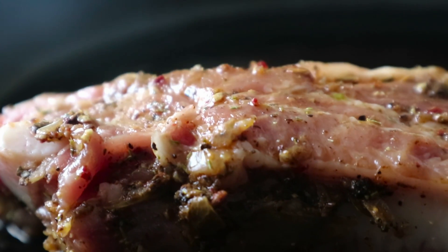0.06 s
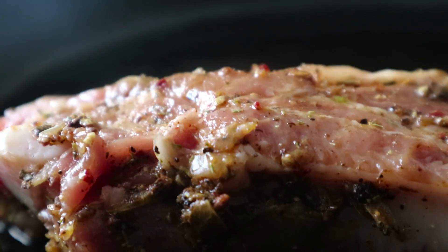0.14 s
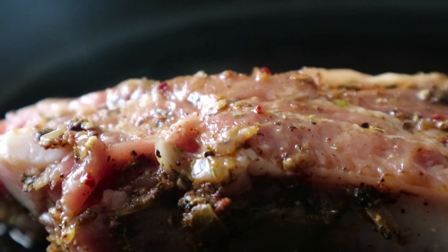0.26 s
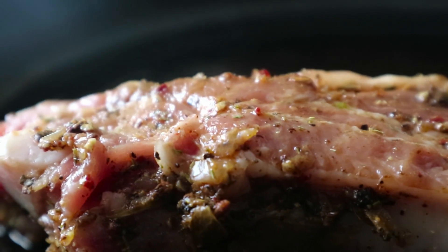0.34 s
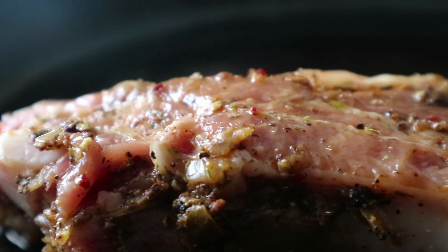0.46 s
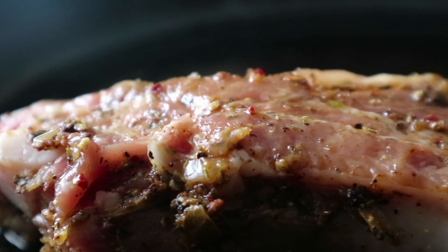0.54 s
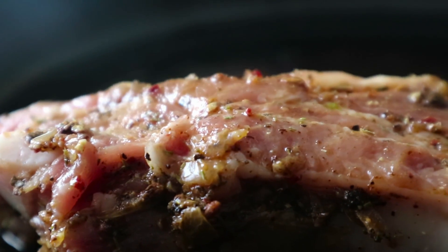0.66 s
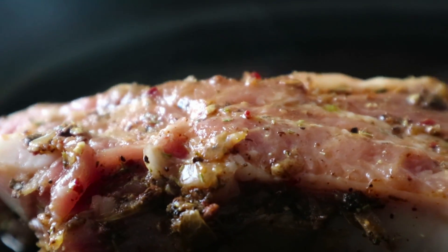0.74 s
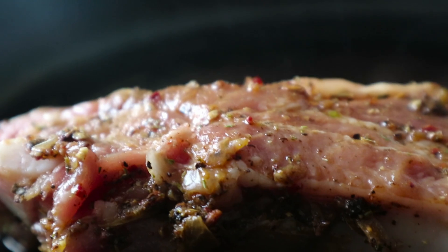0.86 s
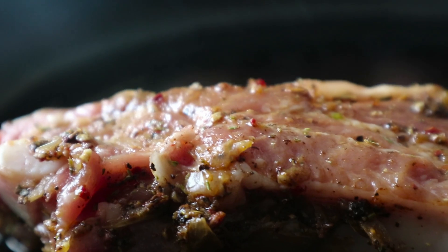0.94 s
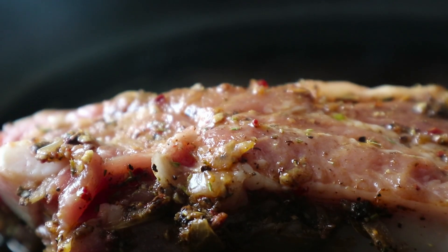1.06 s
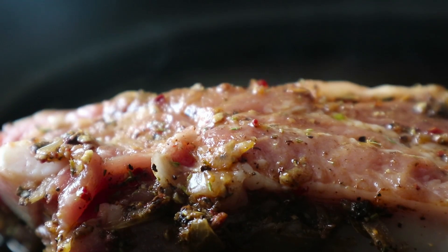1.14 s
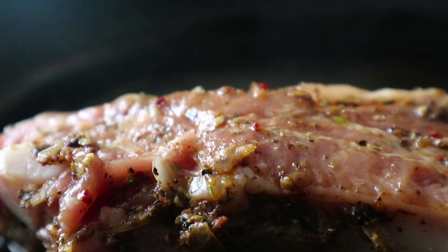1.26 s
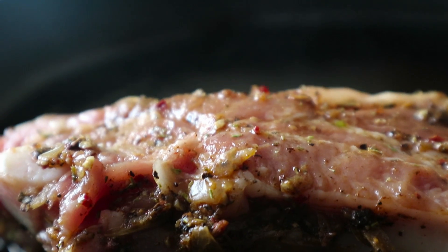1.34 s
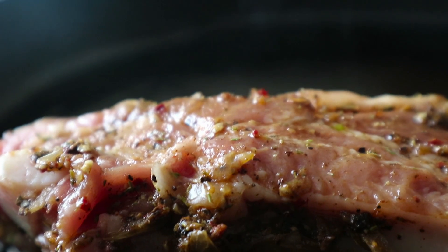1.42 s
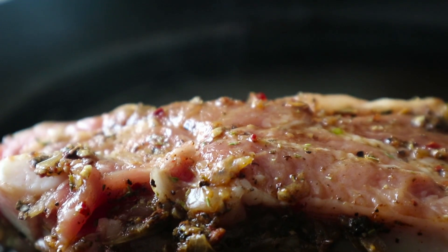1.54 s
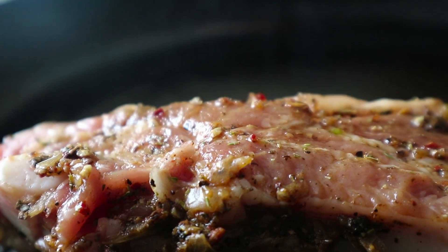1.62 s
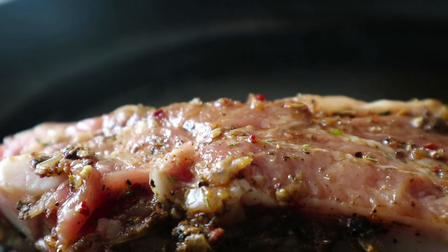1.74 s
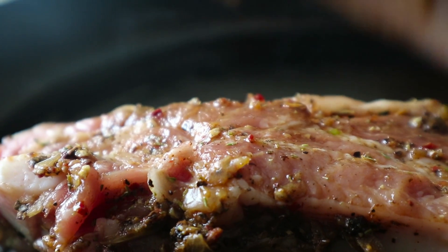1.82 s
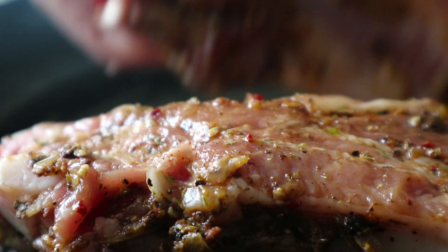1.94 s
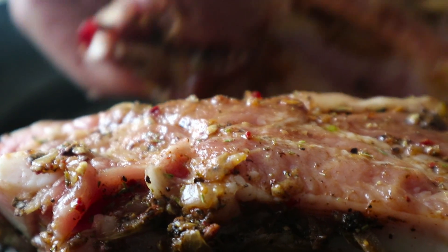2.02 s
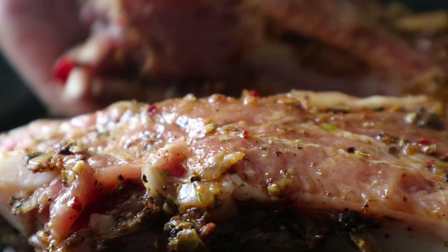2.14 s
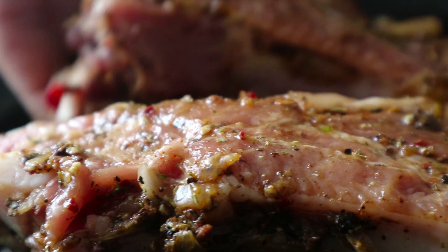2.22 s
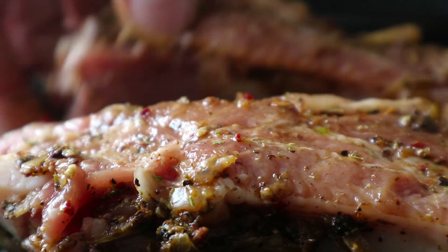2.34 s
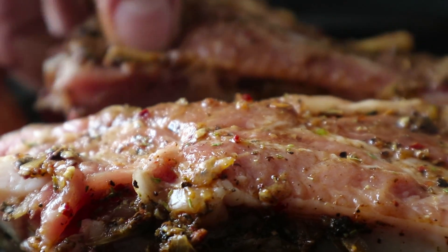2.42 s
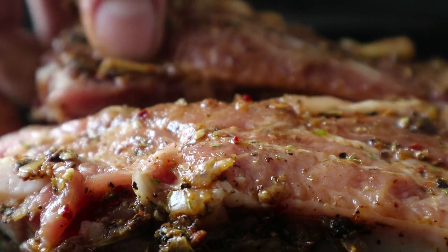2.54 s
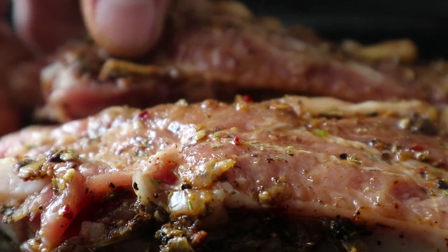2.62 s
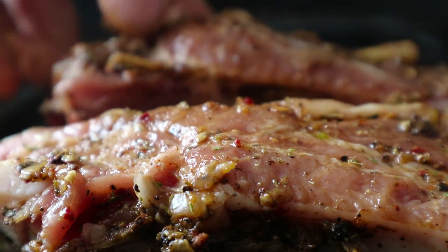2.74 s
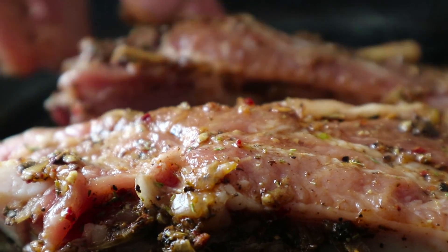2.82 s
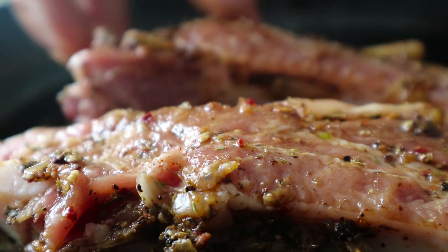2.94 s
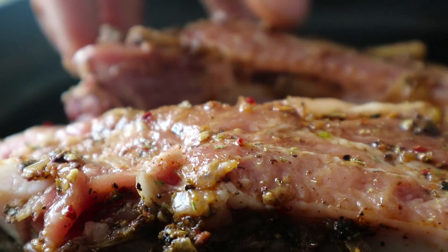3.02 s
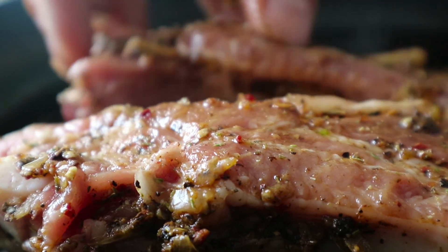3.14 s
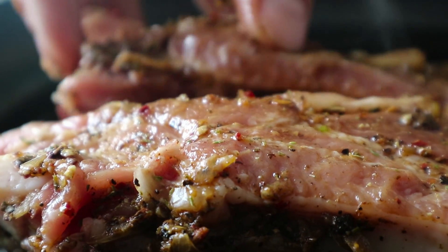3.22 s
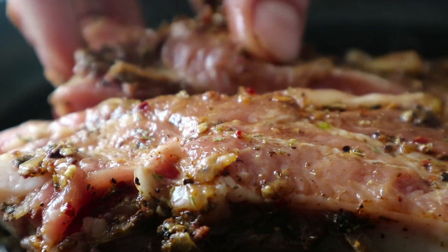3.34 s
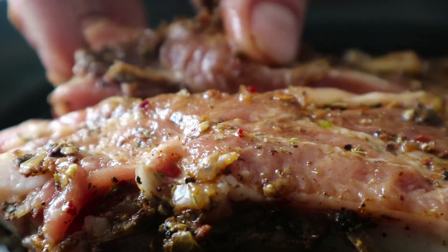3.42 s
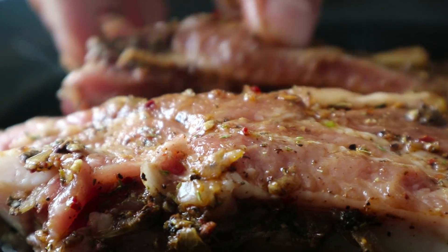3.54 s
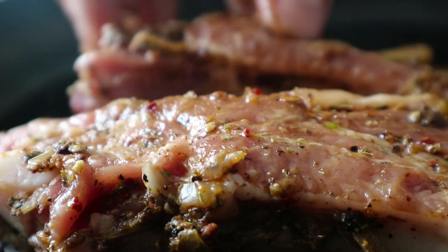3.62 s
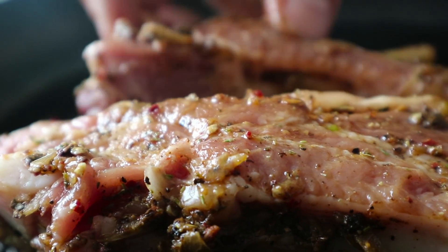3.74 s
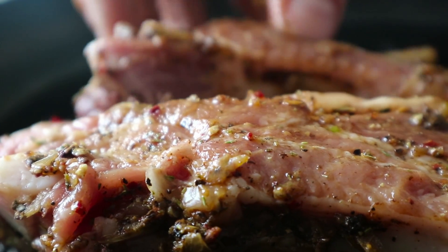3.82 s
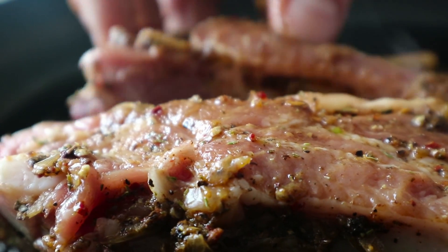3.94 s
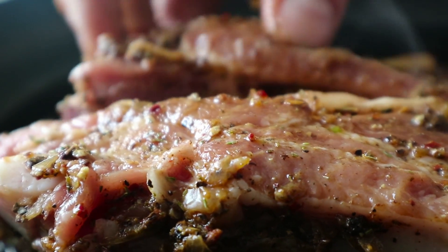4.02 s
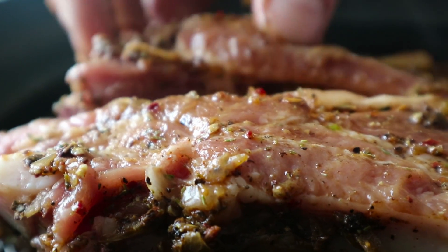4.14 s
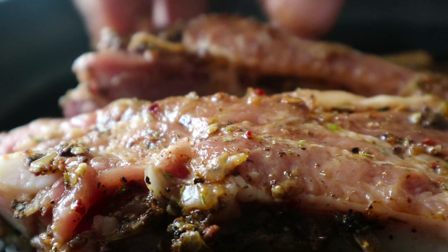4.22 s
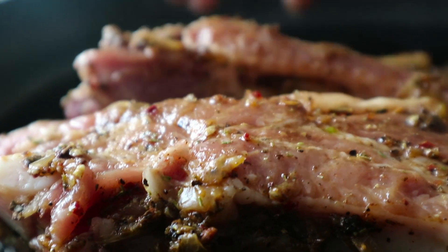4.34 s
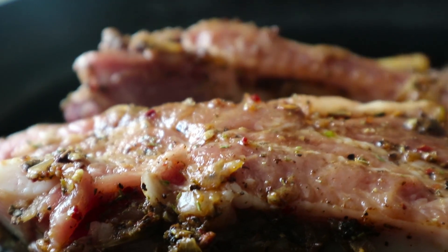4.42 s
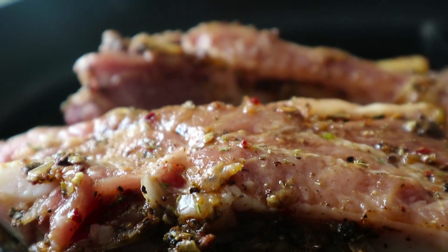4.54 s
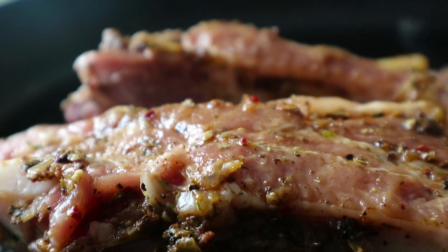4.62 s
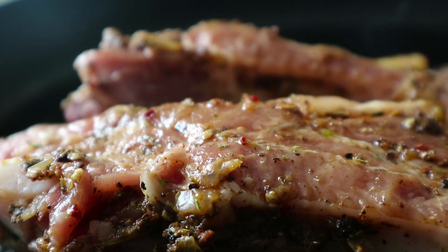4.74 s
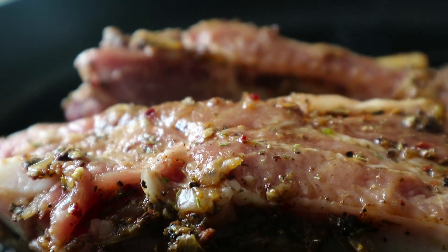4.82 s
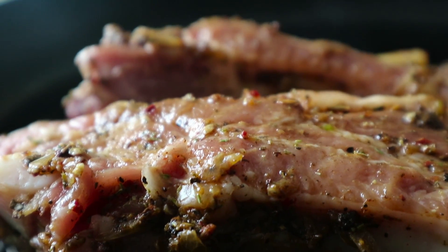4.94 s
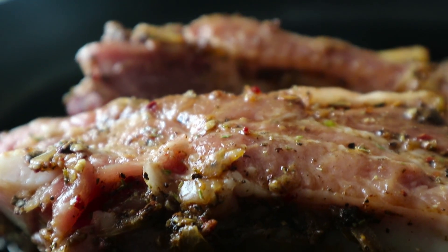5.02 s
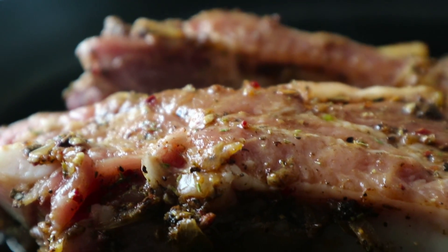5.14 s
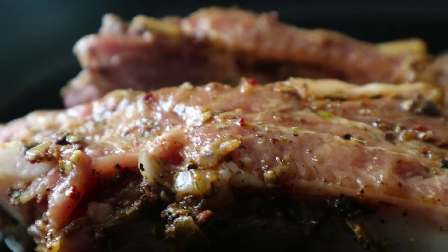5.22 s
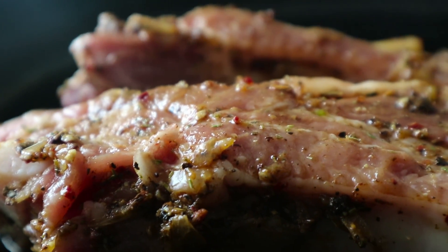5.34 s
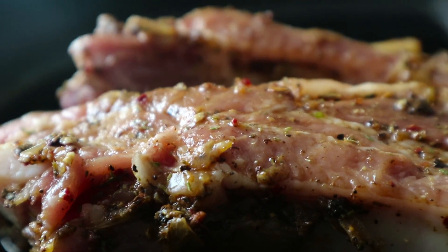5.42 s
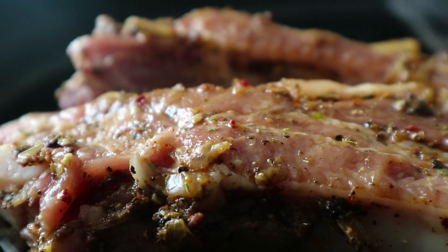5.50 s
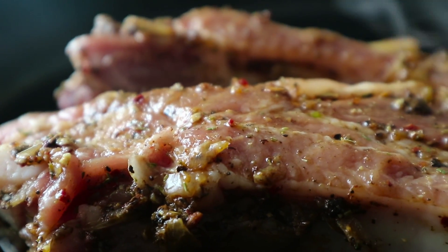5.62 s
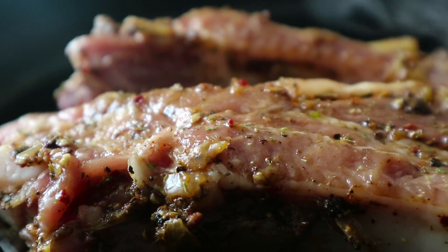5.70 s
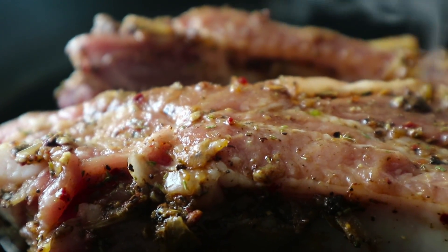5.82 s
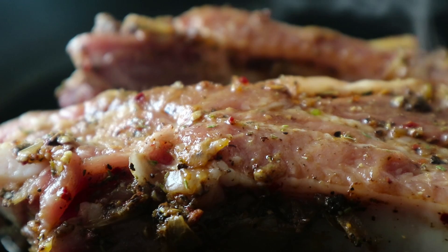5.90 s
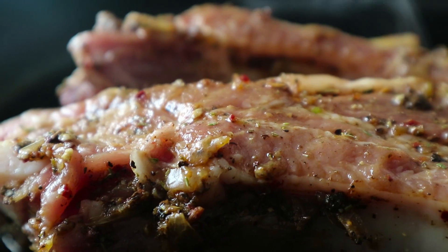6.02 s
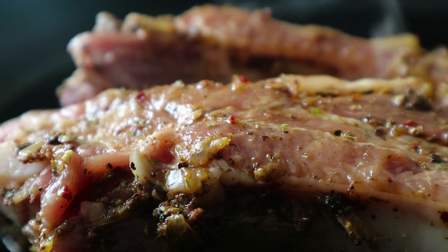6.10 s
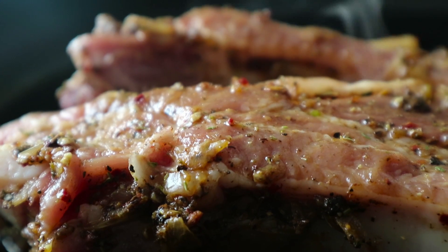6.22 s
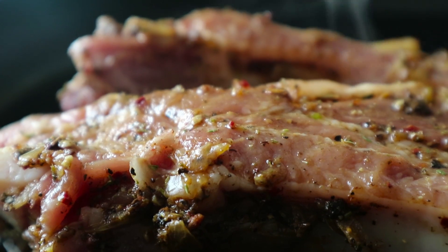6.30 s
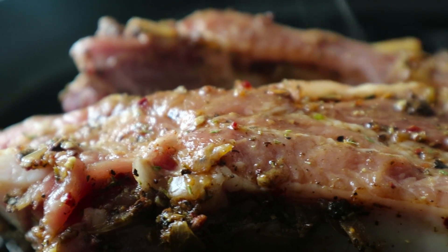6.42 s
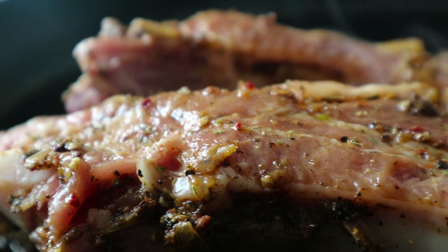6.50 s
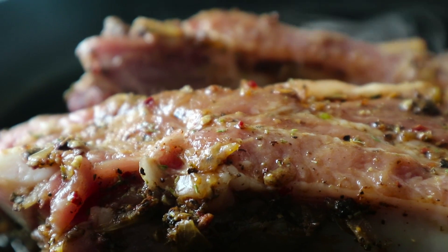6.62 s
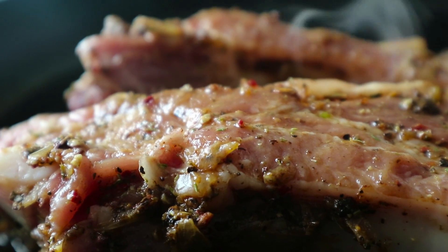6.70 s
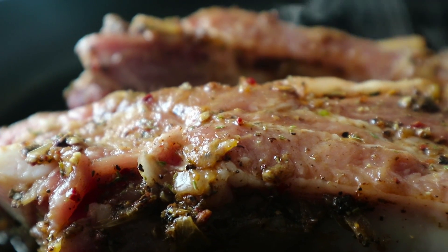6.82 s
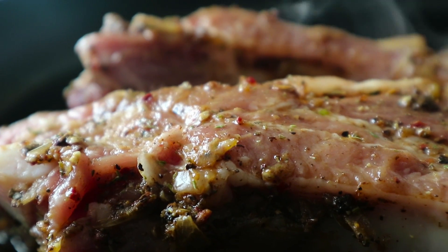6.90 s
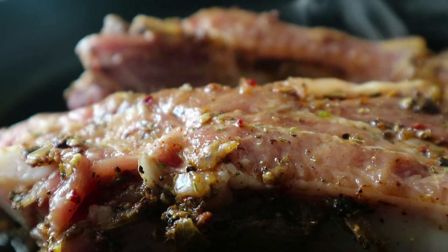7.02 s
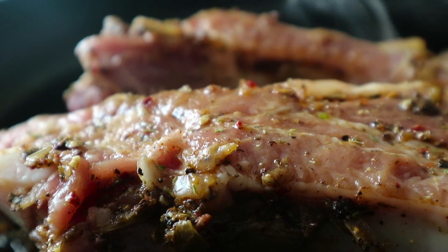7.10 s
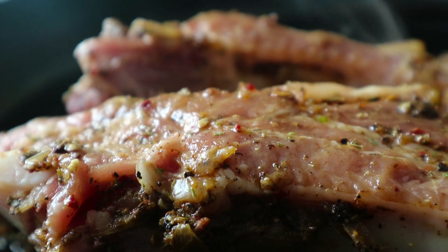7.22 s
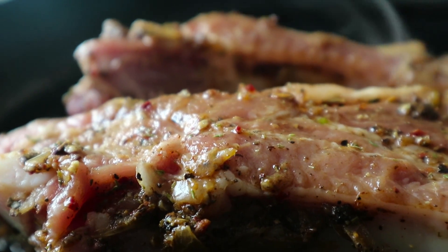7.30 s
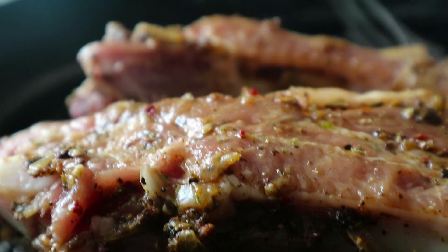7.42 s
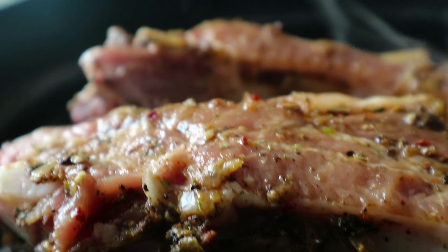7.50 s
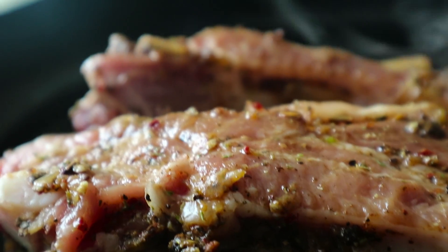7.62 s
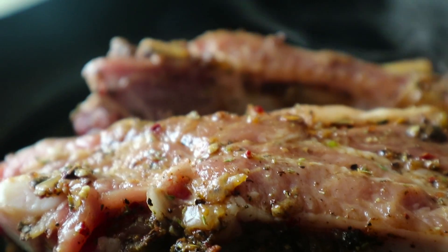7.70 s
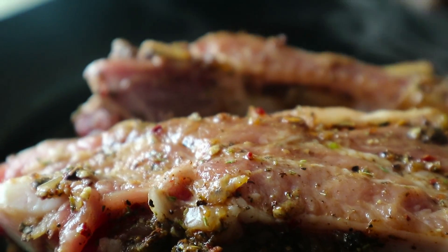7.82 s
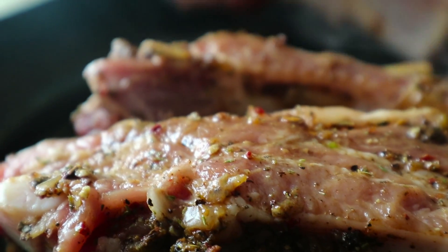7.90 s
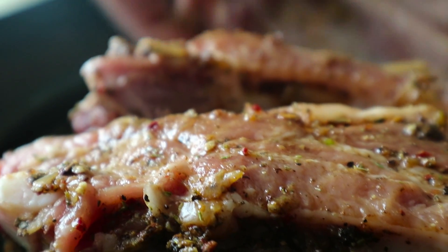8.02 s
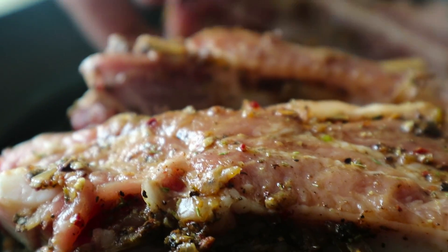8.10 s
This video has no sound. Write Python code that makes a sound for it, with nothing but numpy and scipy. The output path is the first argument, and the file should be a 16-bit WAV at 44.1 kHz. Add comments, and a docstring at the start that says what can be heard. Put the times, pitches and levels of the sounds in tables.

```python
"""Ribs frying in a steel pan

A kitchen, a stereo microphone close to the pan. A marinated rib fries in hot oil; after two seconds a
second rib is laid behind it and pressed down, and the sizzle grows. Steam bubbles of all sizes burst
along the meat, air pockets under the new rib ring at a sliding pitch, large bubbles pop and fat spits.
The pan rings faintly and the room answers, over a low rumble."""
import sys
import numpy as np
from scipy import signal
from scipy.fft import rfft, irfft, next_fast_len
from scipy.io import wavfile
from scipy.ndimage import uniform_filter1d, map_coordinates

SR = 44100
rng = np.random.default_rng(int(sys.argv[2]) if len(sys.argv) > 2 else 0)


def wav_record(signal):
    """Record a signal, one row per channel, as 16-bit PCM in the file named by sys.argv[1]."""
    frames = np.transpose(np.atleast_2d(signal))
    bounded = np.clip(frames, -1, 1)
    # unit amplitude maps onto the largest positive 16-bit level
    quanta = np.round(bounded * 32767).astype(np.int16)
    wavfile.write(sys.argv[1], SR, quanta)


N = 359856
M = next_fast_len(N + SR // 2, True)  # FFT length, with room for the tails
TIME, HZ = np.arange(N) / SR, np.fft.rfftfreq(M, 1 / SR)
SIDES = np.array([[.5], [-.5]])  # shares a left-right difference between the two microphones


def amp(db):
    """Gain of a level in dB."""
    return 10 ** (np.asarray(db) / 20)


def unit(x):
    """x at rms 1."""
    return x / np.sqrt(np.mean(np.abs(x) ** 2) + 1e-20)


def along(points, hz):
    """(Hz, value) points interpolated on a log frequency axis."""
    f, v = np.transpose(points)
    return np.interp(np.log(hz + 1), np.log(f + 1), v)


def curves(rows):
    """One value per sample for each column after the time."""
    times, *columns = np.transpose(rows)
    return [np.interp(TIME, times, column) for column in columns]


def wobble(rate):
    """A random curve through rate knots a second."""
    return map_coordinates(rng.standard_normal(int(N * rate / SR) + 4), [TIME * rate], order=1)


def mode(centre_hz, width_hz):
    """Spectrum of a causal resonance of gain 1 at its centre."""
    return 1j * HZ * width_hz / (centre_hz ** 2 - HZ ** 2 + 1j * HZ * width_hz)


def bursts(rate, spread_db, lag_s=0, width_s=0):
    """Stereo impulses, many small, few large, most pushing outwards; each has its own lag on the left."""
    when, sign, size, place = rng.random((4, int(rate * N / SR)))
    size = np.sign(sign - .25) * amp(spread_db * np.minimum(-np.log(1 - size), 4.8))
    right = (when * N).astype(int)
    lag = SR * (lag_s + width_s * (2 * place - 1) ** 3)
    left = np.clip(right + np.round(lag).astype(int), 0, N - 1)
    return unit(np.array([np.bincount(left, size, N), np.bincount(right, size, N)]))


def rumble(rise_s=.073, fall_s=.018):
    """Faint, unsteady rumble of stove and room, only partly alike at the two microphones."""
    # spectrum of the rumble: (frequency [Hz], relative level [dB])
    tone = [(15, -2), (30, -8), (70, -12), (140, 0.5), (180, 6.5), (260, -3), (400, -48)]
    # its brief swells: (time [s], peak level [dB])
    swell_peaks = [(0.77, -73), (2.07, -85), (2.45, -71), (2.89, -62), (3.41, -77), (3.75, -77),
                   (4.07, -61), (4.2, -66), (4.68, -75), (5.38, -68), (6.02, -74)]
    both, left, right = rng.standard_normal((3, N))
    noise = irfft(rfft([both + .8 * left, both + .8 * right], M) * amp(along(tone, HZ)), M)[:, :N]
    swells = sum(amp(db) * np.exp(-np.abs(TIME - s) / np.where(TIME < s, rise_s, fall_s))
                 for s, db in swell_peaks)
    return (amp(-73.5 + 2.5 * wobble(11)) + swells) * unit(noise)


def kitchen(x, tail_db, tails):
    """Direct sound, echoes and reverberation; several room tails take turns, crossfading thrice a second."""
    # echoes off nearby surfaces: (delay [s], level [dB])
    walls = [(.0012, -41), (.0088, -30), (0.017, -49)]
    # decay of the room: (frequency [Hz], time to fall 60 dB [s])
    decay = [(200, 0.51), (2000, 0.41), (10000, 0.15)]
    turn = TIME * 3 % tails
    wet = rfft(x, M) * (1 + sum(amp(db) * np.exp(-2j * np.pi * HZ * s) for s, db in walls))
    for k in range(tails):
        hz, t, noise = signal.stft(rng.standard_normal((2, SR // 3)), SR, nperseg=256)
        tail = signal.istft(noise * amp(-60 * t / along(decay, hz)[:, None]), SR, nperseg=256)[1]
        tail = np.pad(tail / np.linalg.norm(tail[0]), ((0, 0), (400, 0)))  # arrives 9 ms late
        away = np.abs((turn - k + tails / 2) % tails - tails / 2)
        fade = np.cos(np.pi / 2 * np.minimum(away, 1))
        wet += amp(tail_db) * rfft(tail, M) * rfft(x.mean(0) * fade, M)
    return irfft(wet, M)[:, :N]


def steel_pan(spectrum):
    """The frying shakes the pan, whose modes ring along with the direct sound."""
    # modes of the pan: (frequency [Hz], width [Hz], level against the direct sound [dB])
    modes = [(146, 5.3, -24), (177, 13, -22), (250, 15, -2.5), (281.7, 4.7, 0.5), (354, 5.3, -39),
             (417, 9.2, -9), (624, 33, -13), (699, 26, 1.5), (870, 26, 4), (1016, 16, -4.5), (1125, 34, -6),
             (1216, 44, -4.5), (1350, 44, -9), (1686, 21, -14), (1758, 25, -10), (1915, 22, -7),
             (2000, 18, -37), (2450, 23, -7.5), (2710, 12, -0.5), (2750, 19, -27), (3044, 24, -1)]
    return spectrum * (1 + sum(amp(db) * mode(hz, width_hz) for hz, width_hz, db in modes))


def spits(half_length_s=.011, width_hz=1300):
    """Hot fat spits and brief clumps of crackling bubbles: each time a brief, dense hiss around its own pitch.
    Returns a spectrum."""
    # spits of fat, and near 1.7 kHz early on brief clumps of crackling bubbles: (time [s], level [dB], pitch
    # [Hz])
    events = [(.03, -46, 6500), (.555, -37, 1750), (.75, -38, 1700), (1.0, -48, 7500), (1.045, -40, 1300),
              (1.14, -38, 1800), (1.225, -39, 1900), (1.475, -39, 1900), (1.84, -42, 5800),
              (2.47, -38, 6000), (3.02, -35, 6000), (3.2, -35, 5300), (3.73, -35, 6000), (3.98, -34, 5600),
              (4.47, -30, 3000), (4.502, -29, 1450), (4.535, -31, 1400), (4.965, -29, 1600),
              (5.095, -31, 1950), (5.42, -38, 5400), (5.82, -36, 5600), (6.085, -36, 5200),
              (7.05, -31, 2200), (7.556, -33, 5500), (7.588, -36, 5900), (7.69, -37, 6000),
              (7.695, -31, 1950), (7.73, -34, 5500), (7.975, -31, 1950)]
    band_gain = np.sqrt(SR / width_hz / np.pi * 2)  # makes up for the power lost outside the band
    out = 0
    for s, db, hz in events:
        envelope = amp(db) * np.exp(-((TIME - s) / half_length_s) ** 2)
        hiss = envelope * bursts(rate=6000, spread_db=3, width_s=.00015)
        out = out + band_gain * mode(hz, width_hz) ** 2 * rfft(hiss, M)
    return out


def pocket(track, width_hz, rate, spread_db, lag_s):
    """Steam bursts ring an air pocket whose pitch follows its changing shape. Returns a spectrum."""
    pitch_hz, level_db = curves(track)
    kicks = bursts(rate, spread_db)[1] * np.exp(2j * np.pi * rng.random(N))
    pole = np.exp(-np.pi * width_hz / SR)
    ring = signal.lfilter([1], np.poly([pole, pole]), kicks)
    ring *= np.exp(2j * np.pi * np.cumsum(pitch_hz) / SR)
    sounding = (TIME > track[0][0]) & (TIME < track[-1][0])
    surge_db = .8 * wobble(25)  # the steam comes through unevenly
    arrival = np.exp(-2j * np.pi * HZ * lag_s * SIDES)
    return arrival * rfft(amp(level_db + surge_db) * sounding * unit(ring.real), M)


def air_pockets():
    """Three pockets sing under the pressed rib; one patters under the near rib at the start."""
    # the course of each pocket: (time [s], pitch [Hz], level [dB])
    low = [(2.55, 2050, -69), (2.8, 2068, -33), (2.95, 2054, -31), (3.06, 2010, -26.5), (3.16, 1937, -29),
           (3.25, 1880, -27), (3.4, 1850, -27), (3.55, 1760, -26.5), (3.63, 1676, -31), (3.82, 1622, -29.5),
           (3.94, 1472, -32), (4.0, 1340, -29), (4.08, 1288, -28), (4.2, 1239, -29.5), (4.3, 1310, -37),
           (4.5, 1378, -35), (4.7, 1400, -34), (4.95, 1381, -39), (5.3, 1360, -43), (5.9, 1292, -41.5),
           (6.5, 1328, -44.5)]
    high = [(2.7, 3525, -58), (2.9, 3700, -33), (3.25, 3875, -30), (3.45, 4030, -32), (3.58, 3970, -31),
            (3.68, 3940, -37), (3.78, 3890, -30.5), (4, 3945, -32), (4.2, 4067, -33), (4.45, 3780, -64)]
    side = [(3.84, 2910, -63), (3.98, 2910, -34), (4.1, 3050, -31), (4.16, 3053, -32), (4.24, 2971, -35),
            (4.29, 3000, -29), (4.322, 2973, -25), (4.34, 3060, -44), (4.38, 3123, -43), (4.48, 3080, -34),
            (4.62, 3106, -41), (5.1, 3150, -34.5), (5.9, 3127, -40), (6.5, 3263, -40), (7.2, 3297, -34),
            (8.16, 3297, -38.5)]
    near = [(0, 1764, -46.5), (1, 1771, -47.5), (2, 1751, -47.5), (2.5, 1750, -58)]
    return (pocket(low, width_hz=515, rate=4000, spread_db=1.5, lag_s=.00005)
            + pocket(high, width_hz=470, rate=3500, spread_db=2, lag_s=.00002)
            + pocket(side, width_hz=390, rate=2500, spread_db=3, lag_s=.00001)
            + pocket(near, width_hz=410, rate=350, spread_db=2.5, lag_s=0))


def crackle(rate=45, spread_db=.94, scatter_octaves=.33, wander_db=3):
    """Lesser bubbles burst at random moments; returns them as rows for pops()."""
    # one row per rib: (start [s], weakest peak [dB], typical pitch [Hz], left-right [dB])
    ribs = [(0, -31.5, 1810, 8), (2.75, -22.5, 2800, -1)]
    count = int(rate * N / SR)
    rows = []
    for start_s, weakest_db, pitch_hz, balance_db in ribs:
        when, size = rng.random((count, 2)).T
        detune, place = rng.standard_normal((count, 2)).T
        peak_db = weakest_db - spread_db * np.log(1 - size)
        hz = pitch_hz * 2 ** (scatter_octaves * detune)
        spray_db = -15 + 9 * np.log2(hz / 2500)  # smaller bubbles spray more
        drawn = np.transpose([when * N / SR, peak_db, hz, balance_db + wander_db * place, spray_db])
        rows += [row for row in drawn if row[0] > start_s + .01]
    return rows


def pops(pop_cycles=.9, snap_cycles=.5, far_from_s=2.15, far_lag_s=.00004):
    """A large bubble sucks in, snaps open, rings out and sprays droplets. Returns a spectrum."""
    # the largest bubbles, and broad snaps that hardly ring:
    # (time [s], peak [dB], pitch [Hz], left-right [dB], spray against the peak [dB])
    largest = [(0.0303, -21, 4200, 0, -9), (0.0363, -23.5, 1560, 0.0, -24.0),
               (0.0586, -20.5, 1910, -1.0, -26.0), (0.0971, -27.5, 5390, -1.0, -10.0),
               (0.1182, -20.5, 1880, -2.5, -22.0), (0.2268, -25.5, 2460, -0.5, -20.0),
               (0.4237, -21.0, 4430, -3.5, -15.0), (0.4437, -21.5, 1810, -5.0, -17.0),
               (0.464, -26.0, 2040, 0.5, -17.0), (0.5273, -15.5, 1680, -2.0, -25.0),
               (0.5515, -24.0, 1970, -1.5, -22.0), (0.6659, -19.0, 1910, -2.0, -24.0),
               (0.721, -21.5, 2170, -2.5, -22.0), (0.75, -24.5, 1590, -2.0, -24.0),
               (0.7852, -28.0, 4960, -1.0, -13.0), (0.8199, -23.0, 2280, -4.0, -24.0),
               (0.8585, -23, 1850, -2.0, -28.0), (0.8807, -26.0, 1850, -6.0, -18.0),
               (0.994, -23.0, 5880, -3.0, -13.0), (1.0805, -25.5, 1960, -1.5, -19.0),
               (1.2191, -23.5, 2020, -2.0, -24.0), (1.2688, -23.5, 1910, -2.0, -22.0),
               (1.3309, -26.5, 1930, -1.5, -21.0), (1.4963, -24.5, 1480, 1.5, -24.0),
               (1.549, -25.0, 1830, -2.0, -23.0), (1.5676, -24.5, 1830, 0.0, -25.0),
               (1.633, -25.5, 6320, -2.5, -13.0), (1.6625, -25.0, 1360, 2.5, -23.0),
               (1.6913, -24.5, 1570, 1.0, -20.0), (1.748, -25.5, 1760, -1.5, -21.0),
               (1.8339, -25.0, 5620, -2.0, -13.0), (1.8528, -25.0, 6210, -0.5, -14.0),
               (2.1909, -21.0, 3840, 1.0, -17.0), (2.2421, -20.0, 3620, -5.0, -21.0),
               (2.3054, -20.5, 2370, -6.0, -19.0), (2.3125, -21.0, 5950, -0.5, -12.0),
               (2.3613, -18.0, 3800, -4.0, -19.0), (2.3806, -15.5, 2420, -4.0, -20.0),
               (2.4632, -17.0, 3030, -7.0, -15.0), (2.4966, -18.0, 2760, -3.0, -20.0),
               (2.5074, -13.5, 4970, -1.0, -13.0), (2.6582, -11.0, 5750, -3.0, -17.0),
               (2.7769, -12.5, 4970, -1.5, -13.0), (2.8348, -13.0, 5450, -5.0, -12.0),
               (3.0163, -6.0, 4120, 0.5, -14.0), (3.1303, -11.5, 2000, -3.5, -13.0),
               (3.2725, -4.5, 4080, 0.5, -19.0), (3.2735, -9, 3900, 0.5, -22),
               (3.4, -10.5, 5230, -4.0, -13.0), (4.4658, -13.0, 3070, -4.5, -26.0),
               (4.5011, -13.0, 1550, -2.5, -23.0), (4.5766, -12.0, 2570, -3.5, -18.0),
               (4.7143, -12.5, 1730, -2.0, -20.0), (4.7885, -13.0, 1640, -3.5, -22.0),
               (5.1359, -11.0, 4880, -2.5, -15.0), (5.174, -11.5, 4120, -2.0, -17.0),
               (5.3315, -15.0, 3360, 0.0, -27.0), (5.3788, -2.5, 2820, -1.5, -35.0),
               (5.4185, -13.0, 4760, -3.5, -14.0), (5.447, -15.5, 1790, -2.5, -25.0),
               (5.5053, -13.0, 3580, -4.5, -20.0), (5.5889, -4.5, 1650, -2.0, -31.0),
               (5.6079, -15.0, 3090, -0.5, -24.0), (5.6206, -15.0, 3180, -5.5, -23.0),
               (5.6481, -14.5, 2830, -3.0, -18.0), (5.699, -13.0, 2690, -2.5, -17.0),
               (5.7797, -15.0, 3420, -2.5, -18.0), (5.7985, -13.0, 3200, 0.0, -19.0),
               (5.8411, -11.0, 4530, -2.5, -18.0), (5.8528, -15.5, 3040, -1.0, -19.0),
               (5.918, -11.5, 3770, -2.5, -18.0), (5.9462, -14.0, 3220, -5.0, -20.0),
               (5.9659, -16.5, 5740, -0.5, -12.0), (6.0718, -15.0, 1620, -2.5, -26.0),
               (6.0828, -10.0, 4570, -2.5, -17.0), (6.2125, -12.5, 4530, -1.0, -15.0),
               (6.2357, -14.0, 2030, 0.0, -21.0), (6.2787, -15.5, 2970, 0.5, -24.0),
               (6.3463, -13.5, 4120, 0.0, -15.0), (6.4392, -14.5, 2150, -3.0, -23.0),
               (6.4949, -15.0, 3010, -1.0, -22.0), (6.516, -15.0, 2350, -0.5, -23.0),
               (6.5775, -15.5, 2790, -2.5, -15.0), (6.7846, -14.0, 1780, -2.0, -26.0),
               (6.71, -14, 1600, -2, -23), (6.9015, -14, 3000, -2, -19), (6.9152, -12.0, 1620, -2.0, -22.0),
               (6.9281, -13.5, 2180, -4.0, -19.0), (6.964, -11.5, 3000, -1.0, -21.0),
               (7.0164, -9.5, 3440, -2.5, -21.0), (7.0396, -16.0, 2470, -4.0, -21.0),
               (7.0653, -17.5, 1970, -3.5, -17.0), (7.235, -14.5, 1990, -4.5, -20.0),
               (7.3313, -8, 1890, -4.5, -20.0), (7.475, -16.0, 3440, -4.5, -25.0),
               (7.4817, -4.0, 1680, -2.0, -29.0), (7.5339, -16.5, 3110, -3.5, -20.0),
               (7.5545, -11, 5330, -0.5, -9), (7.6421, -15.5, 2590, -4.5, -17.0),
               (7.7285, -14, 2600, -4, -14), (7.8029, -14.5, 2050, -4.5, -19.0),
               (7.8436, -5, 2750, -3.0, -19.0), (7.9935, -17.0, 3400, -2.5, -20.0),
               (8.1486, -14.0, 4350, -3.0, -13.0)]
    snaps = [(0.7652, -20.5, 2300, -1.5, -15), (1.1378, -24, 1500, -3, -20), (1.1405, -22, 1700, -5, -19),
             (2.0708, -13, 1450, -1, -18), (4.8647, -5, 2700, -3, -13), (4.867, -13, 1600, -3, -20),
             (5.0198, -6, 3300, -2.5, -16), (7.6878, -8, 3400, -1, -14), (7.7292, -6, 4800, -3.5, -9)]
    rows = [(*row, pop_cycles) for row in crackle() + largest] + [(*row, snap_cycles) for row in snaps]
    rings, spray = np.zeros((2, 2, N + SR))
    offsets = np.arange(-60, 400)
    t = offsets / SR
    spray_envelope = np.exp(-np.abs(t) / np.where(t < 0, .0003, .001))
    for s, db, hz, balance_db, spray_db, decay_cycles in rows:
        lag_s = far_lag_s * (s > far_from_s)  # the far rib reaches the left microphone later
        cycles = hz * (t - lag_s * SIDES)
        envelope = np.exp(-np.where(cycles < 0, (cycles / .5) ** 2, cycles / decay_cycles))
        gains = amp(db + balance_db * SIDES)
        at = round(s * SR) + offsets
        rings[:, at] += gains * envelope * np.cos(2 * np.pi * cycles)
        spray[:, at] += gains * amp(spray_db) * rng.standard_normal((2, len(t))) * spray_envelope
    return rfft(rings[:, :N], M) + 2 * mode(5600, width_hz=5000) ** 3 * rfft(spray[:, :N], M)


def sizzle(course, tone, rate_at_2khz, q, lag_s, width_s, boil_db, flicker_db):
    """Steam bubbles of eight sizes burst along the meat and ring a cycle or two. Returns a spectrum."""
    level_db, tilt_db = curves(course)
    tilt_db = np.clip(tilt_db, -.8, 2.2)
    pitches = 400 * 2.0 ** (.72 * np.arange(8))
    rings = [mode(hz, hz / q) ** 2 for hz in pitches]
    shape = amp(along(tone, HZ))
    fizz_rms = np.sqrt(np.mean(shape ** 2 * (HZ > 4500) * (HZ < 9000)))
    colour = shape / fizz_rms / np.sqrt(sum(np.abs(ring) ** 2 for ring in rings) + 1e-12)
    boil = wobble(18)  # the oil boils up and calms for all sizes at once
    out = 0
    for hz, ring in zip(pitches, rings):
        flicker = (.7 * wobble(16) + wobble(30)) * np.sqrt(hz / 4000)  # small bubbles come in flurries
        flurry_db = boil_db * boil + flicker_db * flicker
        flurry_db -= uniform_filter1d(flurry_db, SR // 7)  # flurries last under a seventh of a second
        gain = amp(level_db + tilt_db * np.log2(hz / 6500) + flurry_db)
        bubbles = bursts(rate_at_2khz * max(hz, 1400) / 2000, spread_db=3, lag_s=lag_s, width_s=width_s)
        out = out + ring * rfft(gain * bubbles, M)
    return out * colour


def near_rib():
    """The first rib sizzles softly throughout, nearest the microphones."""
    # its sizzle: (time [s], 4.5-9 kHz fizz level [dB], tilt before limiting [dB/octave])
    course = [(0.0, -44, -3.5), (0.722, -50, -22.5), (1.672, -45.5, -4), (1.95, -47.5, -4),
              (2.6, -41.5, -4)]
    # its spectrum: (frequency [Hz], relative level [dB])
    tone = [(24, -75), (60, -55), (130, -35), (300, -20), (500, -10.5), (850, -5), (1350, -4), (1750, -1.5),
            (2200, -9.5), (2700, -7), (3300, -18), (3800, -18), (4400, -14), (5900, -4), (7500, -9),
            (11000, -14), (15800, -24.5)]
    return sizzle(course, tone, rate_at_2khz=1200, q=1.09, lag_s=.000005, width_s=.00015,
                  boil_db=-.4, flicker_db=1.47)


def far_rib():
    """A faint sizzle further back swells to take the lead as the second rib is pressed into the oil."""
    # its sizzle: (time [s], 4.5-9 kHz fizz level [dB], tilt before limiting [dB/octave])
    course = [(1.95, -43.5, -2.5), (2.1, -41.5, 0), (2.42, -34.5, 0.5), (2.47, -31, 1), (2.7, -29.5, 1.4),
              (2.88, -28, 1), (3.2, -26.5, 3.5), (3.5, -30, -0.5), (3.65, -29.5, .5), (3.72, -26.5, 1),
              (3.95, -25.5, 2), (4.2, -28, .5), (4.51, -31.5, -1.6), (5.54, -33, -0.9), (5.96, -31.5, -0.2),
              (6.24, -34, -1.1), (6.74, -32, 0.5), (7.36, -34, -2.9), (8.16, -32, 0.7)]
    # its spectrum: (frequency [Hz], relative level [dB])
    tone = [(24, -80), (100, -61), (250, -40.5), (500, -18), (900, -25), (1200, -5.5), (1980, 1),
            (2250, -2), (3300, 2.5), (4200, 1), (4800, -1.5), (5600, -2), (8000, -7), (12000, -19),
            (15800, -31.5)]
    return sizzle(course, tone, rate_at_2khz=1900, q=1.36, lag_s=.00004, width_s=.00016,
                  boil_db=.43, flicker_db=1.0)


def scene():
    """Both ribs, their pockets, spits and pops shake the pan and sound in the kitchen."""
    # ripple from reflections off the pan's rim and the meat: (frequency [Hz], gain [dB])
    rim = [(1000, 0), (1250, -1), (1450, -.5), (1950, 0), (2230, 0), (2500, .5), (2850, -1.5), (3150, -2.5),
           (3550, -2), (4050, -0.5), (4400, -2), (4850, -1.5), (5200, 0), (5600, -1.5), (6000, -0.5),
           (6600, -1.5), (7300, -1), (7950, -2.5), (8450, 0), (9100, -0.5), (9550, -1.5), (10300, -0.5)]
    # balance between the two microphones: (frequency [Hz], left-right [dB])
    balance = [(60, 5), (110, -6), (200, 1.5), (380, 3.5), (700, 0.5), (1290, -1.5), (2380, -4), (4400, -1),
               (8120, -1.0), (15000, -3.5)]
    ribs = near_rib() + far_rib()
    bass_loss = HZ ** 2 / (HZ ** 2 + 550 ** 2)  # small sources radiate little bass
    steam = bass_loss * air_pockets()
    colour = amp(along(rim, HZ) + along(balance, HZ) * SIDES)
    frying = (ribs + spits() + steam) * colour + bass_loss ** .95 * pops()
    at_pan = irfft(steel_pan(frying), M)[:, :N]
    return kitchen(at_pan, tail_db=-8.5, tails=4) + rumble()


def record(dry):
    """The recorder keeps nothing above 15.83 kHz."""
    return irfft(rfft(dry, M) * (HZ < 15830), M)[:, :N]


dry = scene()
out = record(dry)
wav_record(out)
```